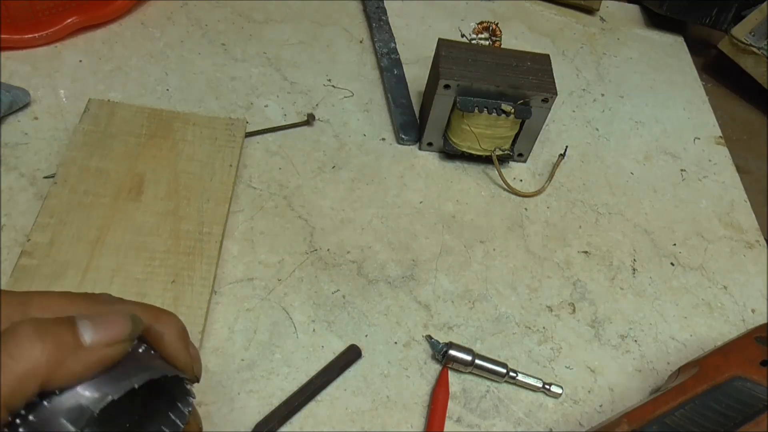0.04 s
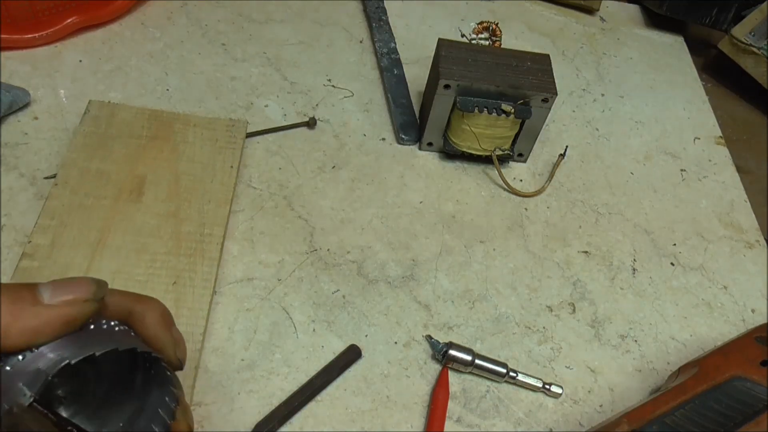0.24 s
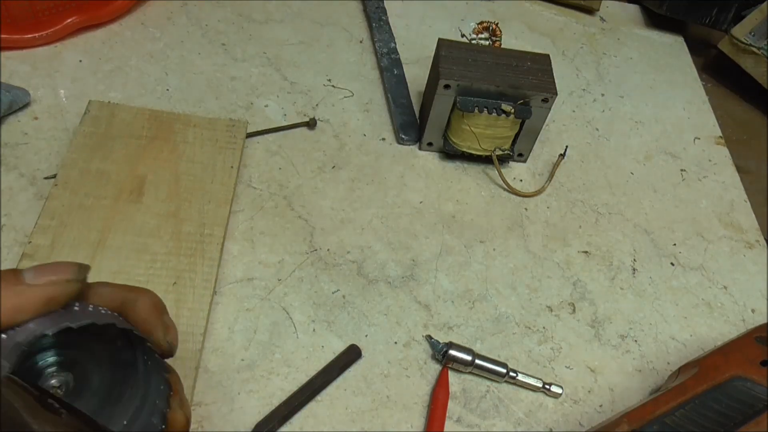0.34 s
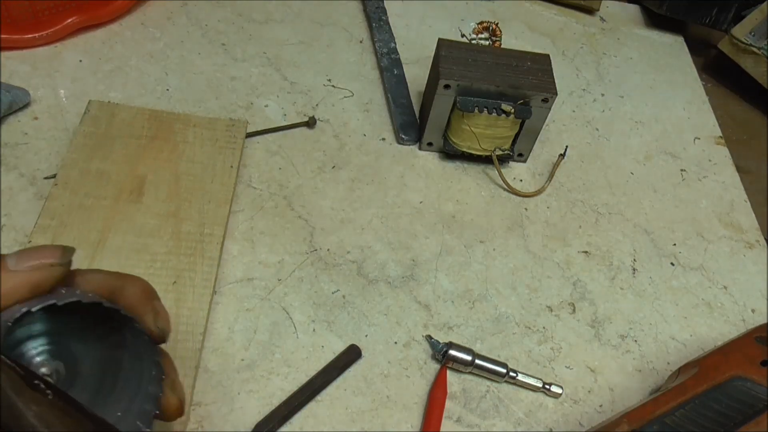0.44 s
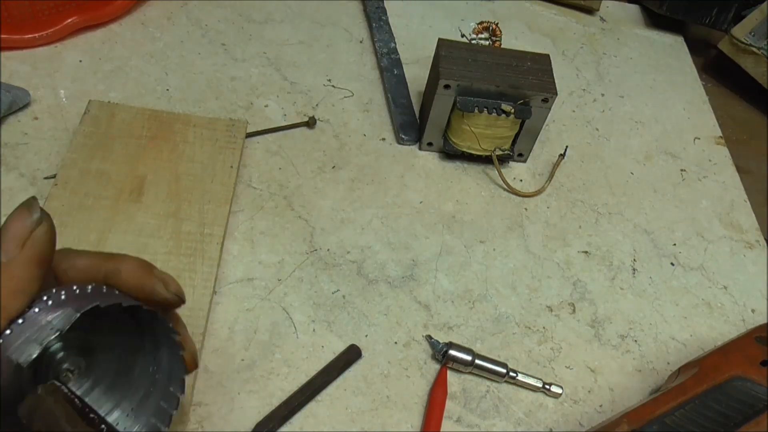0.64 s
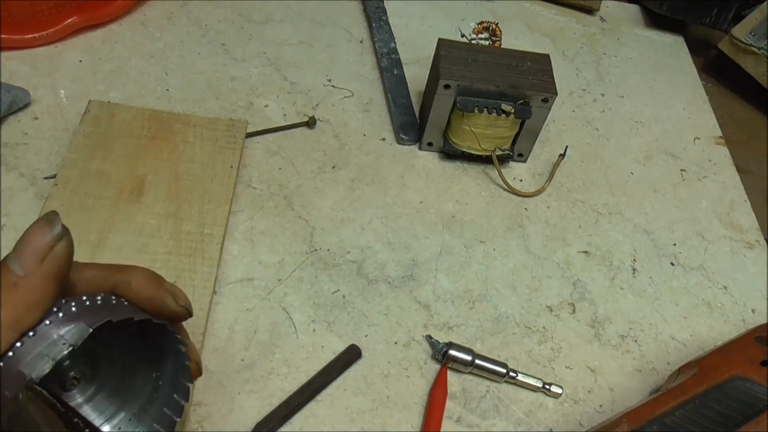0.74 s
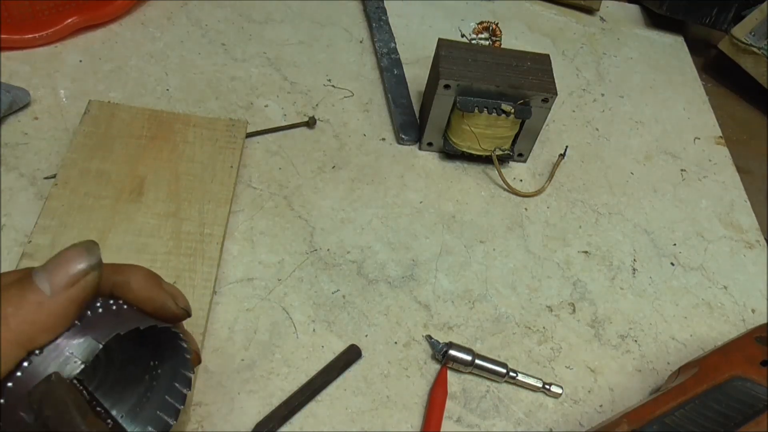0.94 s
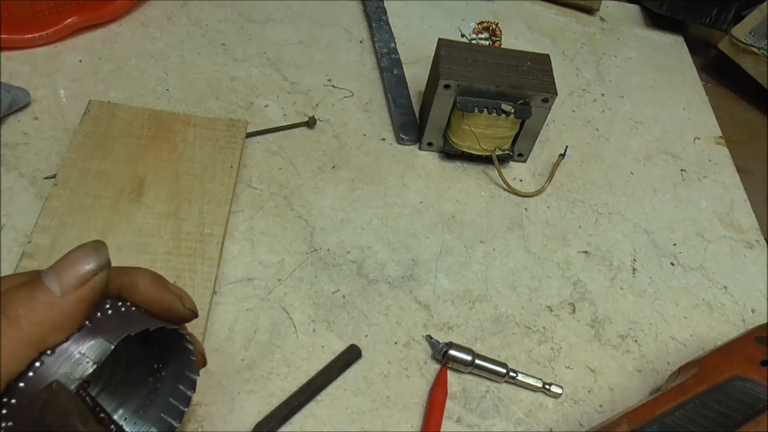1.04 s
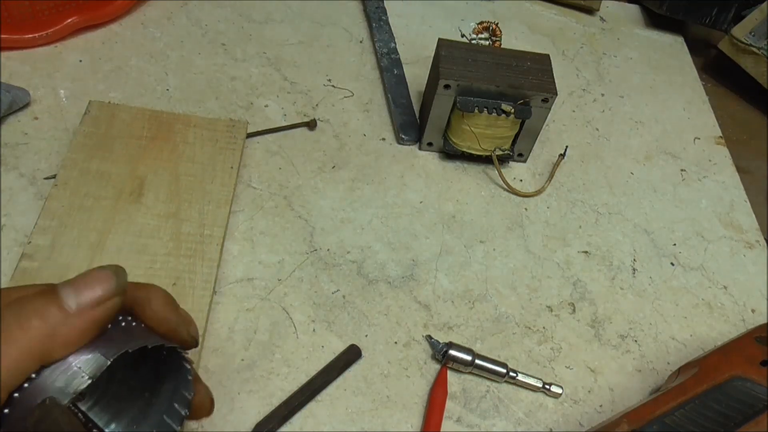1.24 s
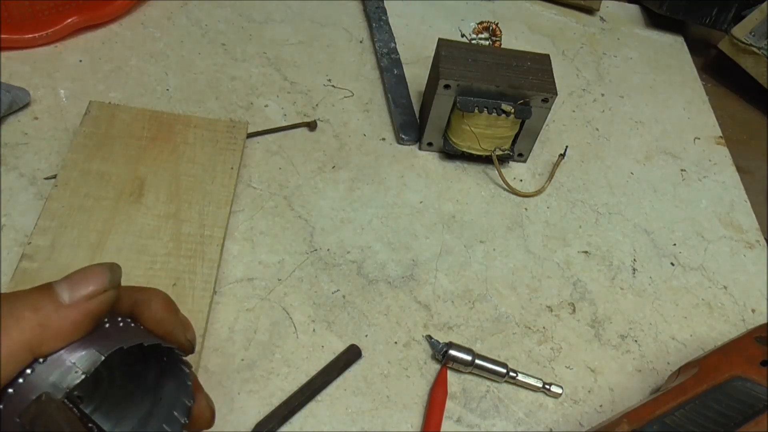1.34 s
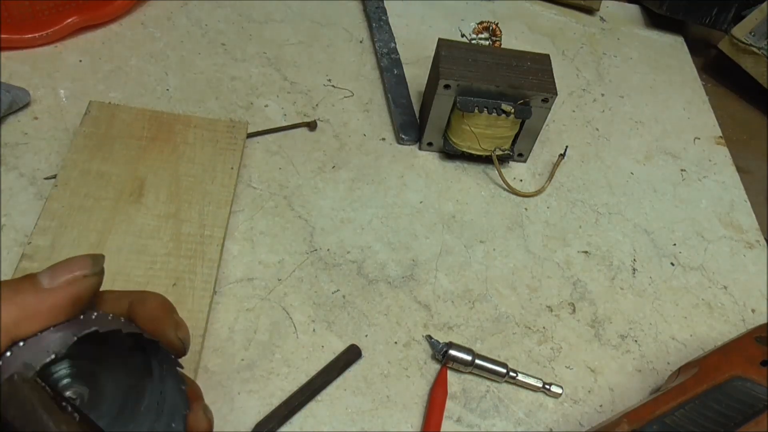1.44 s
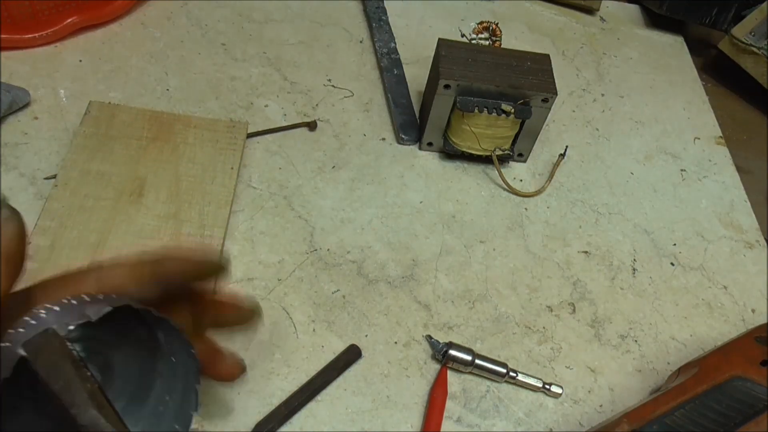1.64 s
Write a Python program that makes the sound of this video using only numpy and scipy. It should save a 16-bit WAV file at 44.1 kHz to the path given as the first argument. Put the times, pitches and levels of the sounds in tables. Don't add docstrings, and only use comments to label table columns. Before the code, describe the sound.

Thin perforated metal flexed in the fingers: one sharp loud snap, smaller tinny clicks, faint fan hum

```python
import sys
import numpy as np
from scipy import signal
from scipy.io import wavfile
from scipy.ndimage import uniform_filter1d

SR = 44100
rng = np.random.default_rng(int(sys.argv[2]) if len(sys.argv) > 2 else 0)


def makeup_ratio(level_db):
    decades = np.asarray(level_db, float) / 20
    return 10 ** decades


def transcribe(signal):
    frames = np.atleast_2d(signal).T
    limited = np.clip(frames, -1, 1)
    pcm = np.round(limited * 32767).astype(np.int16)
    wavfile.write(sys.argv[1], SR, pcm)


N = 74970
STRIKE_RISE_S = 0.000091
SNAP_S = 0.24893


def band(x, hz, width):
    return signal.lfilter(*signal.iirpeak(min(hz, .45 * SR), hz / width, fs=SR), x)


def band_twice(x, hz, width):
    return band(band(x, hz, width), hz, width)


def below(x, hz):
    return signal.sosfilt(signal.ellip(N=6, rp=1, rs=40, Wn=hz, fs=SR, output="sos"), x)


def unit(x):
    return x / np.sqrt(np.mean(x ** 2))


def read(table, hz):
    table_hz, table_db = np.array(table).T
    return np.interp(np.log(hz), np.log(table_hz), table_db)


def walk(rate):
    hold = int(SR / rate)
    steps = np.repeat(rng.standard_normal(N // hold + 1), hold)
    return 1.3 * uniform_filter1d(uniform_filter1d(steps, hold), hold)[:N]


def decay(t, t60):
    return np.exp(-np.log(1000) * np.maximum(t, 0) / t60)


def ring(s, modes, rise):
    t = np.maximum(np.arange(N) / SR - s, 0)
    sines = sum(makeup_ratio(db) * np.sin(2 * np.pi * hz * t) * decay(t, t60) for hz, db, t60 in modes)
    return (1 - np.exp(-t / rise)) * sines


def varied(modes, spread_db=1.0, detune=0.036):
    chance = rng.standard_normal((len(modes), 2))
    return [(hz * (1 + detune * a), db + spread_db * b, t60) for (hz, db, t60), (a, b) in zip(modes, chance)]


def pan(x, db):
    return x * makeup_ratio(np.array([[db / 2], [-db / 2]]))


# (frequency [Hz], side level re mid [dB])
SIDE_LEVELS = [(30, -3), (150, -2.5), (300, -1.5), (600, -8), (2000, -3.5), (6000, -3), (14000, -4.5)]


def spread(hz, width):
    mid, side = (unit(band_twice(rng.standard_normal(N), hz, width)) for _ in range(2))
    return mid + makeup_ratio(read(SIDE_LEVELS, hz)) * side * np.array([[1], [-1]])


# (frequency [Hz], level per Hz [dB])
SHOP_SPECTRUM = [(15, -66), (25, -33.5), (60, -25), (293, -11), (405, -8.5), (1100, -11.5), (1190, -0.5),
                 (3520, -35), (8830, -39), (16000, -47)]
# (frequency [Hz], width [Hz], level [dB])
HUM = [(407.4, 49, -69.5), (1217, 20, -63), (760, 370, -61), (1496, 140, -68.5), (1790, 170, -64.5),
       (2600, 630, -75), (4450, 850, -77), (5690, 150, -83), (7210, 1400, -77.5), (8850, 1800, -79.5),
       (12900, 4900, -82.5), (14900, 900, -84)]


def shop():
    shop_db, swell_db, flicker_db = -55, .4, 1
    swell = swell_db * walk(5.8)
    bed = 0
    for hz in 28 * 2 ** np.arange(0, 9.3, 1 / 3):
        level = read(SHOP_SPECTRUM, hz) + swell + flicker_db * walk(11.9)
        bed = bed + makeup_ratio(level) * np.sqrt(hz) * spread(hz, hz / 3)
    hum = sum(makeup_ratio(db) * spread(hz, width) for hz, width, db in HUM)
    return makeup_ratio(shop_db) * unit(bed) + hum


# (frequency [Hz], rms level [dB])
FAN_LINES = [(401.3, -67.5), (802.6, -71), (1203.9, -61.5), (1662, -71)]


def fan():
    wobble_db, wander_cycles = 1.8, 0.12
    t = np.arange(N) / SR
    out = 0
    for hz, db in FAN_LINES:
        level = makeup_ratio(db + 3.5 + wobble_db * walk(13.82))
        out = out + level * np.sin(2 * np.pi * (hz * t + wander_cycles * walk(10.3)))
    return out


# (time [s], level [dB])
BUZZ_LEVELS = [
    (0, -77),
    (.3, -81),
    (.36, -67.5),
    (.68, -67),
    (.72, -87),
    (1.15, -72),
    (1.3, -76),
    (1.7, -75),
]


def insect():
    buzz_hz, width_hz, sag_hz, sag_s = 9300, 1100, 613, 1.1
    throb_rate_hz, throb_start_s, duty = 7.6, 0.332, 0.85
    t = np.arange(N) / SR
    phase = (t - throb_start_s) * throb_rate_hz % 1
    throb = np.sin(np.pi * np.clip(phase / duty, 0, 1)) ** 0.56
    high = spread(buzz_hz, width_hz)
    sunk = spread(buzz_hz - sag_hz, width_hz * 1.4)
    level = makeup_ratio(np.interp(t, *np.array(BUZZ_LEVELS).T))
    return level * throb * np.where(t < sag_s, high, sunk)


# (start [s], length [s], level [dB], resonance [Hz], treble level [dB])
SCRAPES = [(0.105, 0.046, -63, 4000, 1), (0.115, 0.0061, -63, 3240, 0), (0.393, 0.074, -71, 4000, 1),
           (0.48, 0.041, -74, 3750, 4), (0.589, 0.022, -69, 4840, -1), (0.849, 0.027, -56, 4780, -17),
           (0.947, 0.069, -57.5, 4590, -10), (1.09, 0.049, -70.5, 4630, -6),
           (1.329, 0.0073, -57.5, 4280, -0.5), (1.33, 0.024, -70.5, 4520, 0),
           (1.676, 0.033, -67.5, 4450, 0)]


def scrapes():
    grain_rate_hz, grain_db, width_hz = 9000, 2.5, 710 * 1.1
    body_db, air_db, shell_top_hz = -4.5, -11.5, 4980
    t = np.arange(N) / SR
    sizes = makeup_ratio(grain_db * np.minimum(rng.exponential(size=N), 3))
    grains = (rng.random(N) < grain_rate_hz / SR) * sizes * rng.choice([-1, 1], N)
    edge = np.roll(grains, N // 3)
    treble = unit(band(edge, 7850, 1500) + 0.94 * band(edge, 5800, 600))
    air = unit(band_twice(edge, 12700, 2500) + band_twice(edge, 15000, 1600))
    body = unit(band(band(grains, 2400, 1250), 2500, 1200))
    out = 0
    for s, length, db, hz, treble_db in SCRAPES:
        shape = np.sin(np.pi * np.clip((t - s) / length, 0, 1)) ** 0.69
        tone = unit(below(band_twice(grains, hz, width_hz), shell_top_hz))
        rub = tone + makeup_ratio(treble_db) * treble + makeup_ratio(body_db) * body + makeup_ratio(air_db) * air
        out = out + makeup_ratio(db) * shape * rub
    return out


# (time [s], peak level [dB])
TICKS = [
    (0.1145, -70),
    (0.384, -46),
    (0.4569, -47.5),
    (0.5424, -43.5),
    (0.554, -49),
    (0.5588, -44),
    (0.5642, -48),
    (1.3112, -55),
    (1.652, -52),
]


def ticks():
    t = np.arange(N) / SR
    hiss = unit(band(rng.standard_normal(N), 10000, 9400))
    bursts = sum(makeup_ratio(db - 11.0) * (t > s) * np.exp(-np.maximum(t - s, 0) / 0.0017) for s, db in TICKS)
    return bursts * hiss


# (time [s], peak level [dB], ring [Hz], body level [dB], treble level [dB])
CLICKS = [(0.1543, -51.5, 4220, -15, -14), (0.5813, -51.5, 4790, -14, -24), (0.5902, -58, 4850, -10, -8),
          (0.68, -28, 4894, -15, -29.5), (0.812, -46, 4890, -15, -15), (0.823, -40.5, 4870, -5.5, -29),
          (0.8465, -56, 4500, -14, -30), (0.851, -58, 4900, -5, -14), (0.8563, -42, 4760, -12, -32),
          (0.8623, -42.5, 4670, -11, -24), (0.8672, -53, 4370, 4, -19), (0.8692, -37.5, 4840, -8.5, -30),
          (0.8717, -51, 4870, -9, -30), (0.8733, -49.5, 4630, 3.5, -18), (0.956, -56, 4630, -16, -22),
          (0.959, -59, 4660, -8, -11), (0.98, -50, 4500, -6, -24), (0.971, -41.5, 4840, -7.5, -17.5),
          (1.0187, -37, 4790, -3.5, -17), (1.1522, -53, 4800, -1, -26), (1.1669, -47.5, 4870, 1, -12),
          (1.2236, -55, 4200, -3, -9), (1.2597, -53.5, 4300, -19, -23.5), (1.3311, -43.5, 4620, -32, -7.5),
          (1.6944, -50.5, 4860, -16, -12)]
# (frequency [Hz], level [dB], t60 [s])
BODY_MODES = [(1770, -9.5, 0.0041), (2240, -9, 0.0067), (2593, -6, 0.011), (3030, -19, 0.006),
              (3900, -12.5, 0.0085)]
# (frequency [Hz], level [dB], t60 [s])
TREBLE_MODES = [(5900, -10, 0.008), (7700, -3, 0.0093), (8820, -2, 0.023), (9560, 1, 0.004),
                (10400, -2, 0.007), (11910, -2, 0.017), (13200, 2.5, 0.0056), (14800, -2, 0.0067)]


def clicks():
    late_s, crack_s, crack_db = 0.000423, .00008, -0.5
    ring_t60_s, ring_db_per_db = 0.017, .3
    tail_db, tail_t60_s, tail_db_per_db = -10.5, 0.024, 0.18
    dip_hz, dip_width_hz = 5547, 1330
    t = np.arange(N) / SR
    low = high = 0
    for s, db, hz, body_db, treble_db in CLICKS:
        s = s + late_s
        main = [(hz, 0, ring_t60_s * makeup_ratio(ring_db_per_db * (db + 39))),
                (hz, tail_db + tail_db_per_db * (db + 37.5), tail_t60_s)]
        lower = [(hz * 0.922, -4, ring_t60_s * 0.39), (hz * 0.9, -9, ring_t60_s * 0.23)]
        cluster = ring(s, main, STRIKE_RISE_S) - ring(s, lower, STRIKE_RISE_S)
        crack = makeup_ratio(crack_db) * (s - t) / crack_s * np.exp(-((t - s) / crack_s) ** 2)
        body = crack + ring(s, varied(BODY_MODES), STRIKE_RISE_S)
        low = low + makeup_ratio(db + 3) * (cluster + makeup_ratio(body_db + 8.5) * body)
        high = high + makeup_ratio(db + treble_db + 4) * ring(s, varied(TREBLE_MODES), STRIKE_RISE_S)
    for _ in range(2):
        low = low - band(low, dip_hz, dip_width_hz)
    return low + high


# (time [s], frequency [Hz], level [dB], t60 [s])
PANELS = [(0.6802, 1790, -46, 0.018), (.6806, 4915, -49.5, 0.069), (.6806, 8500, -55, 0.019),
          (.6806, 5900, -54, 0.017), (.8128, 15500, -55, .015), (.8128, 4900, -59, .04),
          (.8676, 2600, -41, .006), (.9722, 1800, -49, .002), (.8128, 12370, -48, 0.013),
          (.8128, 5900, -58, .02), (1.0194, 2600, -37.5, 0.014), (1.0197, 7400, -45.5, 0.01),
          (1.1676, 2600, -39, 0.0086), (.1555, 13900, -60, .01)]


def panels():
    return sum(ring(s, [(hz, db, t60)], STRIKE_RISE_S) for s, hz, db, t60 in PANELS)


# (frequency [Hz], level [dB], t60 [s])
SNAP_MODES = [(530, -21.5, 0.016), (1165, -24.5, 0.024), (1610, -13, 0.011), (2097, -15.5, 0.015),
              (2700, -7.5, 0.0087)]
# (frequency [Hz], level [dB], t60 [s])
SNAP_TREBLE = [(8850, -5, 0.002), (10130, -24, 0.014), (11030, -17, 0.007), (12350, -7, 0.0068),
               (14300, -12.5, .004), (15100, -13.5, 0.0039)]
# (frequency [Hz], level [dB], t60 [s])
SNAP_UPPER = [(12080, -6.5, 0.0082), (7640, -23, .014), (9976, -24, 0.017), (8100, -29.5, 0.016)]
SNAP_THIRD = 4790, -9, .024


def snap():
    snap_db, spike_db, spike_s = -9.5, 3.5, .0001
    pair_hz, pair_db, pair_t60_s, pair_rise_s = (3860, 4040), 4, 0.018, 0.0011
    tail_db, tail_t60_s, wash_db, wash_t60_s = -25, 0.13, -32, 0.088
    t = np.arange(N) / SR - SNAP_S
    spike = -makeup_ratio(spike_db) * np.exp(-(t / spike_s) ** 2)
    pair_modes = [(hz, pair_db, pair_t60_s) for hz in pair_hz]
    pair = ring(SNAP_S, pair_modes + [SNAP_THIRD], pair_rise_s)
    tail = spread(3950, 750) + makeup_ratio(-16.0) * spread(12150, 1000)
    tail = makeup_ratio(tail_db) * tail * (t > 0) * decay(t, tail_t60_s)
    wash = makeup_ratio(wash_db) * spread(8500, 7000) * (t > 0) * decay(t, wash_t60_s)
    shell = ring(SNAP_S, SNAP_MODES, STRIKE_RISE_S) - ring(SNAP_S, SNAP_UPPER, STRIKE_RISE_S)
    treble = ring(SNAP_S - .0003, SNAP_TREBLE, .0001)
    return makeup_ratio(snap_db) * (spike + pair + tail + wash + shell + treble)


# (time [s], level [dB], frequency [Hz], length [cycles])
KNOCKS = [
    (.452, -54, 186, 4.4),
    (0.468, -61.5, 128, 3.2),
    (1.325, -59, 142, 2.9),
    (1.33, -50, 440, 2.7),
    (1.65, -64, 299, 5.9),
]
FLICK = .8673, -34, 1250, 1.3


def knocks():
    t = np.arange(N) / SR
    out = 0
    for s, db, hz, cycles in KNOCKS + [FLICK]:
        shape = np.sin(np.pi * np.clip((t - s) * hz / cycles, 0, 1))
        out = out + makeup_ratio(db) * shape * np.sin(2 * np.pi * hz * (t - s))
    return out


def bench_echo(metal):
    echo_db, t60_s, delay_s, alike, top_hz = -12.5, 0.089, 0.0021, .3, 7000
    t = np.arange(SR // 4) / SR
    tail = rng.standard_normal((2, len(t))) * (t > delay_s) * decay(t, t60_s)
    tail = tail + alike * tail.mean(axis=0)
    tail = makeup_ratio(echo_db) * tail / np.sqrt(np.sum(tail[0] ** 2))
    echo = signal.fftconvolve(metal, tail, axes=1)[:, :N]
    return signal.lfilter(*signal.butter(1, top_hz, fs=SR), echo)


def scene():
    shop_top_hz, shop_pan_db = 15800, -3
    click_pan_db, snap_pan_db, metal_low_hz = 2.8, 1.2, 358
    lag, knock_right_share = .6, 0.93
    air = below(below(shop(), shop_top_hz), shop_top_hz)
    background = pan(air + fan() + insect(), shop_pan_db)
    metal = pan(scrapes() + ticks() + clicks() + panels(), click_pan_db) + pan(snap(), snap_pan_db)
    metal[1] = signal.lfilter([1 - lag, 1], [1, 1 - lag], metal[1])
    metal = signal.sosfilt(signal.butter(3, metal_low_hz, "high", fs=SR, output="sos"), metal)
    metal = metal + knocks() * np.array([[1], [knock_right_share]])
    return metal + bench_echo(metal) + background


def roll_off(x):
    return signal.sosfilt(signal.butter(12, 16830, fs=SR, output="sos"), x)


def record(dry):
    duck_db, attack_s, release_s, top_hz = -10.5, 0.0037, 0.081, 16300
    t = np.arange(N) / SR - SNAP_S
    recovery = np.exp(-np.maximum(t, 0) ** 2 / release_s ** 2)
    duck = duck_db * np.clip(t / attack_s, 0, 1) * recovery
    mix = below(dry * makeup_ratio(duck), top_hz)
    return roll_off(mix)


dry = scene()
out = record(dry)
transcribe(out)
```